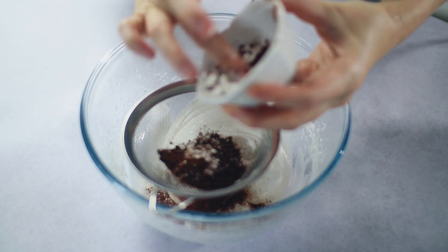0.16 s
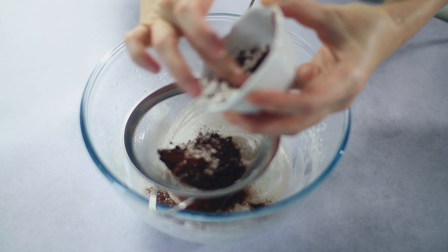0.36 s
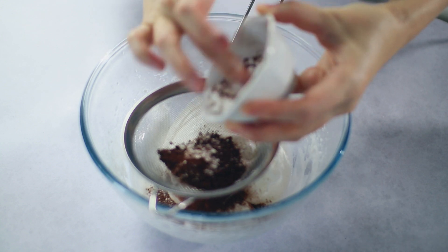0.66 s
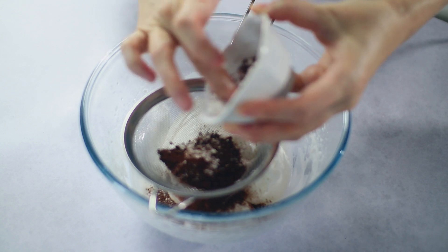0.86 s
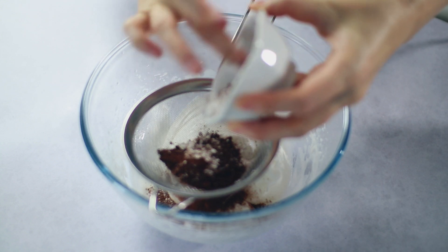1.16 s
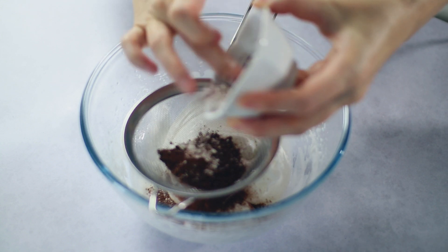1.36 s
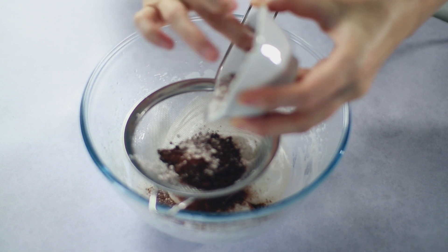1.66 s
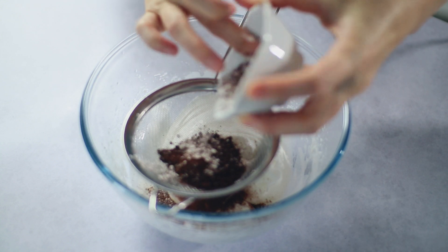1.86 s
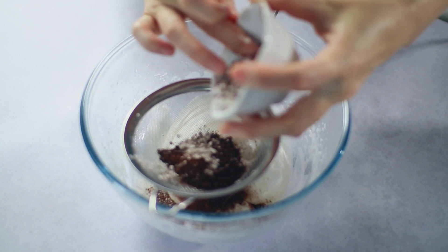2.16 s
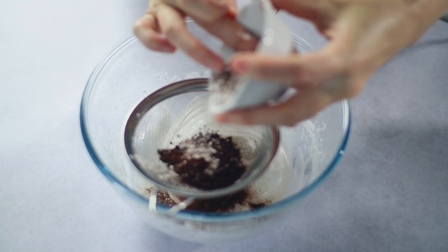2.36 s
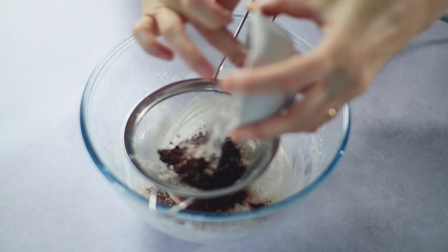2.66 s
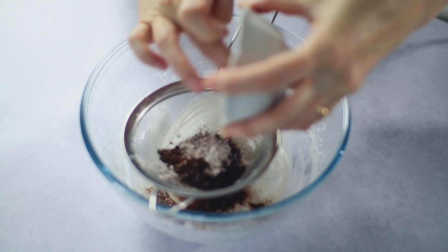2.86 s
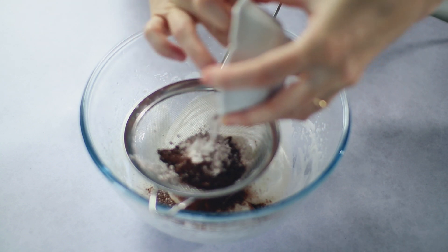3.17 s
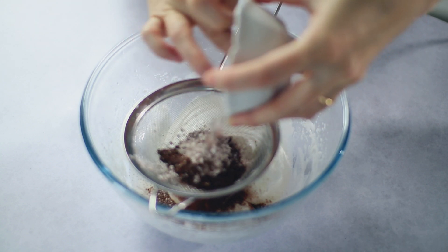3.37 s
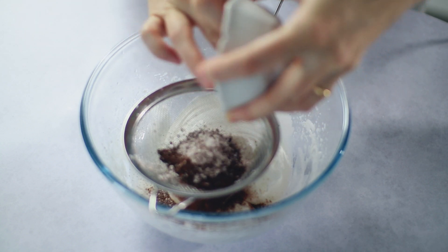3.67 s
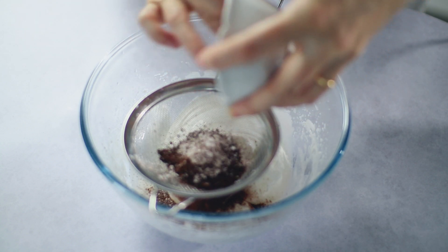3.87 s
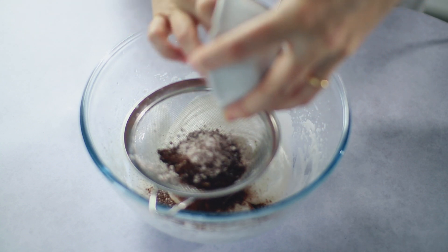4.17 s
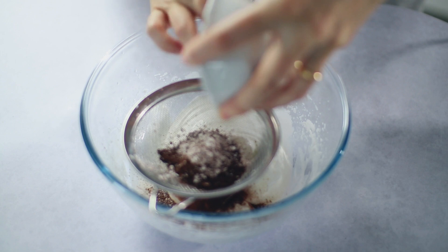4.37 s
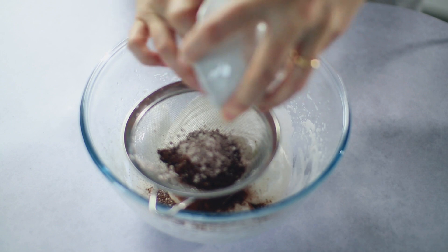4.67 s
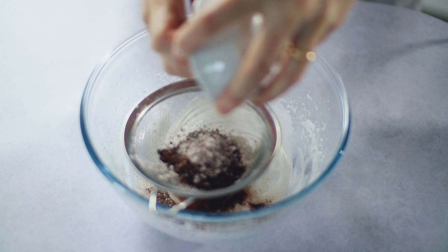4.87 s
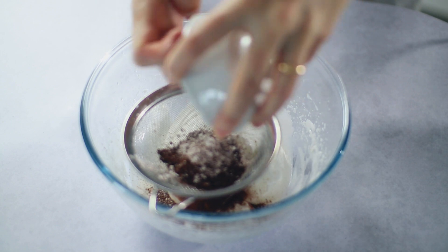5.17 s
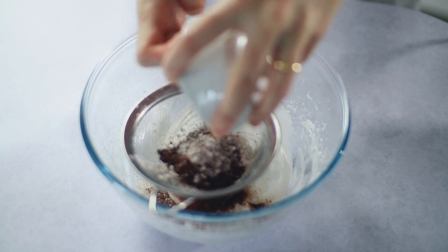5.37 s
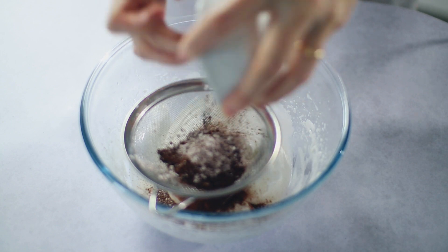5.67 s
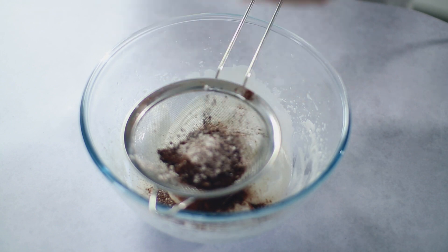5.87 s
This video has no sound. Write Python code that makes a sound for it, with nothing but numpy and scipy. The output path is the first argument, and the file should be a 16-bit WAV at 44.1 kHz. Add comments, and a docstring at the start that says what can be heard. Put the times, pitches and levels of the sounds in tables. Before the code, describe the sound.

In a quiet kitchen, a fingertip faintly rubs powder out of a small porcelain dish. The dish grazes the rim of a steel sieve resting in a glass bowl, then gives several short, bright clinks, each damped by the hand. Near the end it is knocked on the sieve four times in quick succession. The sounds are close, with a short room echo over soft hiss and a faint appliance drone.

```python
"""Emptying a dish into a sieve

In a quiet kitchen, a fingertip wipes powder from a small porcelain dish into a steel sieve that
rests in a glass bowl. The dish clinks against the sieve's rim, and the hand damps its ring.
At the end it is knocked hard on the sieve four times. The room answers every blow with a short echo.
Behind it all are a soft hiss, a faint appliance drone and, at the start, a far-off whine."""
import sys
import numpy as np
from scipy import signal
from scipy.fft import rfft, irfft
from scipy.io import wavfile

SR = 44100
rng = np.random.default_rng(int(sys.argv[2]) if len(sys.argv) > 2 else 0)


def unload_wav(signal):
    """Save mono or channel-first audio to the path in sys.argv[1] as 16-bit WAV at rate SR, clipped to [-1, 1]."""
    wavfile.write(
        sys.argv[1],
        SR,
        np.round(np.clip(np.atleast_2d(signal).T, -1, 1) * 32767).astype(np.int16),
    )


N = 265923
TIME = np.arange(N) / SR

# The dish barely grazes the rim. Each row: start in seconds, high ring in dB, click in dB.
GRAZES = [(0.8279, -29.5, -23.5), (0.912, -47.5, -41), (1.3050, -37, -46), (1.5360, -49, -43),
          (3.3231, -43, -25), (3.9972, -31.5, -31)]
# The dish's edge strikes the rim. Each row: start in seconds, then click, low ring, high ring and
# sieve knock in dB, then the pitch in Hz below which the sieve hardly sounds.
CLINKS = [ (2.0623, -1.5, -12.5, -15, -60, 1410), (2.6585, 5, -55, -30, -30, 2100),
          (3.0053, -7.5, -20.5, -25, -46.5, 1500), (3.7804, 2, -19, -20.5, -10, 1485),
          (4.955, 5, -16.5, -17.5, -14, 700), (5.096, -3.5, -40.5, -39, -40, 1600), ]
# The dish is knocked squarely on the sieve. Each row: start in seconds, sieve knock in dB,
# click in dB, the pitch in Hz below which the sieve hardly sounds.
KNOCKS = [(5.1196, 2, 8.5, 330), (5.2687, -1.5, -1, 470), (5.4237, -1, 7, 450), (5.5802, -6.5, -5.5, 480)]
# The tones of the hand-held dish. Each row: pitch in Hz, level in dB, seconds to fade by 60 dB
# (called t60 below), group (0 follows the low ring level, 1 and 2 the high ring level).
DISH_TONES = [(3743, -3, 0.033, 0), (7448, 5.5, 0.019, 1), (6900, -15.5, 0.039, 1), (7740, -42.5, .4, 1),
              (11170, -21.5, .025, 0), (12240, -22, 0.036, 2), (14800, -27, .025, 2)]
# The tones of the powder-filled sieve in its bowl. Each row: pitch in Hz, level in dB, t60 in seconds.
SIEVE_TONES = [(410, -15.5, 0.0043), (688, -11.5, 0.019), (783, -11.5, 0.017), (936, -14.5, 0.018),
               (1106, -16.5, 0.02), (1503, -21, 0.025), (1669, -3, 0.013), (1877, -9, 0.0072),
               (2210, -21.5, 0.013), (2850, -19, 0.0027), (635, -41, 0.13), (1750, -44, 0.35)]
# The tone colours of the click, the rim's chatter and the powder. Each row: frequency in Hz, gain in dB.
CLICK_COLOUR = [(300, -42), (1500, -33.5), (2100, -15.5), (2700, -5), (4000, -3.5), (5500, -2), (6700, -4),
                (8300, -2.5), (10000, -11.5), (13000, -10), (16000, -21)]
CHATTER_COLOUR = [(1000, -43.5), (5000, -33), (6600, -13), (8000, -3), (9300, -9.5), (11000, -13),
                  (16000, -27)]
POWDER_COLOUR = [(500, -30), (2500, -11), (5000, -7.5), (6500, -7.5), (8500, -2.5), (11000, -6.5),
                 (13500, -13), (16000, -7.5)]
# Firm fingertip strokes. Each row: middle in seconds, length of the main part in seconds, high ring in dB.
FIRM_STROKES = [(0.137, .12, -74), (0.916, 0.15, -76), (1.342, .12, -74), (1.593, 0.11, -75),
                (1.781, .057, -67), (2.23, .15, -60.5), (2.57, .1, -76), (2.841, .18, -64),
                (4.064, 0.16, -77), (4.295, 0.072, -74), (4.497, .1, -69), (4.713, 0.049, -74)]
# Bumps through the bowl to the worktop. Each row: start in seconds, length in seconds, gain in dB.
THUDS = [(0.102, 0.54, -74), (3.777, 0.013, -57), (4.004, 0.27, -78), (5.113, 0.011, -51)]
# The kitchen's echo. Each row: band's bottom and top in Hz, early echo in dB, tail in dB,
# tail's t60 in seconds.
ECHO_BANDS = [(153, 2000, -16.5, -25.5, 0.3), (964, 3900, -21, -24, 0.33), (3020, 5050, -10.5, -16, 0.29),
              (6100, 9600, -11.5, -13, 0.37), (10400, 48000, -10, -16, .35)]
# The tone colour of the room's hiss. Each row: frequency in Hz, gain in dB.
HISS_COLOUR = [(12, -37.5), (20, -3), (86, -9.5), (198, -4.5), (228, -12.5), (328, -3.5), (357, -6),
               (1330, -12), (1960, -11), (2260, -10), (3340, -13), (7310, -14.5), (8890, -15.5),
               (14700, -16.5), (16000, -22)]
# The appliance drone. Each row: centre in Hz, width in Hz, level in dB.
DRONE_BANDS = [(84.5, 12, -84), (614, 14, -86.5), (1320, 220, -79.5), (4307, 460, -78.5)]


def blows(walls=3, lead_s=.004, dish_to_walls_db=-3, sieve_to_walls_db=-1):
    """The dish hits the sieve. Row 0 goes straight to the listener; the other rows go to the walls."""
    out = np.zeros((1 + walls, N))
    t = np.maximum(TIME[:2 ** 14] - lead_s, 0)  # the lead gives the push time to swell
    for s, knock_db, lowest_hz, click_db, click_hz, low_db, high_db, chatter_db, room_db in blow_list():
        sieve = undb(knock_db) * sieve_knock(t, lowest_hz)
        dish = dish_ring(t, low_db, high_db)
        add(out[0], s - lead_s, sieve + dish + contact(t, click_db, click_hz, chatter_db))
        # hand and bowl shield the rings; the contact noise differs in each direction
        shielded = undb(sieve_to_walls_db) * sieve + undb(dish_to_walls_db) * dish
        for wall in out[1:]:
            add(wall, s - lead_s, undb(room_db) * (shielded + contact(t, click_db, click_hz, chatter_db)))
    return out


def blow_list():
    """The start time and settings of every graze, clink and knock."""
    kinds = (graze, GRAZES), (clink, CLINKS), (square_knock, KNOCKS)
    return [(s, *settings(*row)) for settings, table in kinds for s, *row in table]


def graze(high_db, click_db, lowest_hz=704, click_hz=9000, room_db=3.5):
    """Settings for a light touch: mostly the dish's high ring and the rim's rasp, with a trace of sieve."""
    knock_db = click_db - 20
    low_db, chatter_db = high_db - 27, high_db + 20.5
    return knock_db, lowest_hz, click_db, click_hz, low_db, high_db, chatter_db, room_db


def clink(click_db, low_db, high_db, knock_db, lowest_hz):
    """Settings for an edge blow: bright when glancing, duller and with less echo when it lands squarely."""
    squareness_db = knock_db - click_db
    click_hz = 8400 - 100 * squareness_db
    room_db = -3.5 - 0.1115 * squareness_db
    chatter_db = high_db + 16.5
    return knock_db, lowest_hz, click_db, click_hz, low_db, high_db, chatter_db, room_db


def square_knock(knock_db, click_db, lowest_hz, room_db=0.4):
    """Settings for a square blow: harder contact makes the click brighter and the dish ring more."""
    click_hz = 6800 + 171 * click_db
    low_db, high_db = -34 + 2 * click_db, -44 + 2 * click_db
    chatter_db = high_db + 19
    return knock_db, lowest_hz, click_db, click_hz, low_db, high_db, chatter_db, room_db


def dish_ring(t, low_db, high_db, rise_s=0.00088, detune=0.0015):
    """The spot that is hit sets how strongly each tone rings; the grip shifts the pitches a little."""
    strength = undb([low_db, high_db, high_db])
    ring = 0
    for hz, db, t60, group in DISH_TONES:
        pitch = hz * (1 + detune * rng.standard_normal())
        ring += strength[round(group)] * undb(db) * np.sin(2 * np.pi * pitch * t) * fade(t, t60)
    return ring * (1 - np.exp(-t / rise_s))


def sieve_knock(t, lowest_hz, top_hz=2900, slope=10, rise_s=.00015):
    """One short push starts the sieve's dull tones; a glancing blow leaves the low ones at rest."""
    ring = sum(undb(db) * np.cos(2 * np.pi * hz * t) * fade(t, t60) for hz, db, t60 in SIEVE_TONES)
    ring *= 1 - np.exp(-t / rise_s)
    hz = np.arange(len(t) // 2 + 1) * SR / len(t) + 1
    # the force swells and ebbs evenly around the moment of contact
    push = 1 / np.sqrt((1 + (lowest_hz / hz) ** slope) * (1 + (hz / top_hz) ** slope))
    fade_out = 1 - (t / t[-1]) ** 2
    return irfft(rfft(ring) * push, len(t)) * fade_out


def contact(t, click_db, click_hz, chatter_db):
    """The hard first click, and the thin steel rim chattering on the glaze just after it."""
    click = colour(burst(t, t60=0.014, rise_s=.0001), CLICK_COLOUR)
    chatter = colour(burst(t, t60=0.02, rise_s=0.00067), CHATTER_COLOUR)
    return undb(click_db) * cut(click, click_hz, "lowpass") + undb(chatter_db) * chatter


def handle_snap(start_s=2.6584, level_db=-4.5, pitch_hz=6200, width_hz=2000):
    """As the dish is turned it catches the sieve's wire handle: one short, bright snap."""
    out = np.zeros(N)
    snap = burst(TIME[:SR], t60=0.0041, rise_s=.0001)
    for _ in range(2):
        snap = resonate(snap, pitch_hz, width_hz)
    add(out, start_s, undb(level_db) * snap / np.sqrt(np.sum(snap ** 2)))
    return out


def fingertip(grain_db=3, high_width_hz=130, top_width_hz=260):
    """Skin drags powder over the glaze: tiny uneven slips hiss and set two of the dish's tones singing."""
    out = np.zeros(N)
    high_hz, top_hz = DISH_TONES[1][0], DISH_TONES[5][0]
    for middle_s, length_s, high_db, top_db in stroke_list():
        hiss_db = -91.5 + 157 * length_s  # a longer stroke sweeps more powder
        n = int(length_s * SR * 1.4)  # extra time to fade in and out
        slips = rng.standard_normal(n) * undb(grain_db * rng.exponential(size=n))
        sing = undb(high_db) * unit(resonate(slips, high_hz, high_width_hz))
        sing += undb(top_db) * unit(resonate(slips, top_hz, top_width_hz))
        hiss = undb(hiss_db) * unit(colour(slips, POWDER_COLOUR))
        add(out, middle_s - n / SR / 2, np.hanning(n) * (sing + hiss))
    return out


def stroke_list(start_s=.37, end_s=4.5, wipes_per_s=3.8, scatter_s=0.024,
                wipe_s=0.054, wipe_high_db=-78, wipe_top_db=-92):
    """The firm strokes, plus light wiping at a slightly uneven pace."""
    # the glaze sings brighter as it is wiped bare: the top ring gains 2.9 dB a second
    firm = [(s, length_s, high_db, -85.5 + 2.9 * s) for s, length_s, high_db in FIRM_STROKES]
    beats = np.arange(start_s, end_s, 1 / wipes_per_s)
    light = [(s + scatter_s * rng.standard_normal(), wipe_s, wipe_high_db, wipe_top_db) for s in beats]
    return firm + light


def squeak(start_s=5.374, length_s=0.048, pitch_hz=1540, width_hz=130):
    """The dish slips in the grip between two knocks and gives a brief, rough squeak."""
    out, n = np.zeros(N), int(length_s * SR)
    tone = sum(undb(db) * unit(resonate(rng.standard_normal(n), harmonic * pitch_hz, width_hz))
               for harmonic, db in [(2, -60), (3, -56.5), (4, -66)])
    add(out, start_s, np.hanning(n) * tone)
    return out


def thuds(top_hz=260):
    """The bowl presses on the worktop and makes dull bumps."""
    out = np.zeros(N)
    for start_s, length_s, db in THUDS:
        n = int(length_s * SR)
        rumble = unit(cut(rng.standard_normal(n), top_hz, "lowpass", order=1))
        add(out, start_s, undb(db) * np.hanning(n) * rumble)
    return cut(out, hz=700, kind="lowpass")


def kitchen_echo(x, early_t60=0.11, early_rise_s=0.0028, tail_rise_s=0.019):
    """Close echoes from worktop and cupboards, then the soft tail of the room."""
    t, echo = TIME[:SR], 0
    for bottom_hz, top_hz, early_db, tail_db, t60 in ECHO_BANDS:
        early = undb(early_db) * burst(t, early_t60, early_rise_s)
        tail = undb(tail_db) * burst(t, t60, tail_rise_s)
        band = cut(early + tail, bottom_hz, "highpass", order=4)
        echo += cut(band, top_hz, "lowpass", order=4)
    return signal.fftconvolve(x, echo)[:N]


def whine(settled_hz=2150, sag_hz=210, sag_s=0.32, waver_hz=22,
          level_db=-76, fade_db_per_s=9, rise_s=.12, release_s=0.28, end_s=1.1):
    """A thin, wavering, far-off tone that swells, sinks in pitch and dies away."""
    waver = waver_hz * unit(cut(rng.standard_normal(N), 40, "lowpass"))
    pitch = settled_hz + sag_hz * np.exp(-TIME / sag_s) + waver
    swell = np.clip(np.minimum(TIME / rise_s, (end_s - TIME) / release_s), 0, 1)
    return swell * undb(level_db - fade_db_per_s * TIME) * np.sin(2 * np.pi * np.cumsum(pitch) / SR)


def room_tone(hiss_db=-68.5):
    """An even hiss with the faint drone of an appliance."""
    hiss = undb(hiss_db) * unit(colour(rng.standard_normal(N), HISS_COLOUR))
    drone = sum(undb(db) * unit(resonate(rng.standard_normal(N), hz, width_hz))
                for hz, width_hz, db in DRONE_BANDS)
    return hiss + drone


def undb(db):
    """Turn decibels into a gain."""
    return 10 ** (np.asarray(db) / 20)


def unit(x):
    """Scale a sound to an average (rms) level of 1."""
    return x / np.sqrt(np.mean(x ** 2))


def add(track, s, sound):
    """Mix a sound into the track at s seconds."""
    i = max(int(s * SR), 0)
    track[i:i + len(sound)] += sound[:len(track) - i]


def colour(x, points, size=4096):
    """Filter a sound so that its gain follows a curve of (Hz, dB) points."""
    hz, db = np.transpose(points)
    bins = np.maximum(np.arange(size // 2 + 1) * SR / size, 1)
    gain = undb(np.interp(np.log(bins), np.log(hz), db))
    cepstrum = irfft(np.log(gain))
    # fold the filter so that nothing rings before the sound arrives
    cepstrum[1:size // 2] *= 2
    cepstrum[size // 2 + 1:] = 0
    response = irfft(np.exp(rfft(cepstrum)))
    return signal.fftconvolve(x, response)[:len(x)]


def cut(x, hz, kind, order=2):
    """Keep what lies below hz ("lowpass") or above it ("highpass")."""
    return signal.sosfilt(signal.butter(order, min(hz, 0.45 * SR), kind, fs=SR, output="sos"), x)


def resonate(x, hz, width_hz):
    """Keep a band around one pitch, with a gain of 1 at its centre."""
    return signal.lfilter(*signal.iirpeak(hz, hz / width_hz, fs=SR), x)


def fade(t, t60):
    """Die away by 60 dB in t60 seconds."""
    return np.exp(-np.log(1000) * t / t60)


def burst(t, t60, rise_s):
    """A puff of dying noise with a total energy of 1."""
    noise = rng.standard_normal(len(t)) * fade(t, t60) * (1 - np.exp(-t / rise_s))
    return noise / np.sqrt(np.sum(noise ** 2))


def scene(snap_to_walls_db=-8):
    """Blows and rubbing close by, an echo from each wall, and the quiet background."""
    direct, *to_walls = blows()
    rubbing, snap = fingertip() + squeak(), handle_snap()
    echo = sum(kitchen_echo(sound + rubbing + undb(snap_to_walls_db) * snap) for sound in to_walls)
    echo /= np.sqrt(len(to_walls))
    return (direct + rubbing + snap + thuds() + echo + whine() + room_tone())[None]


def record(dry, top_hz=16000):
    """Cut off the very highest treble steeply."""
    return signal.sosfilt(signal.ellip(10, .2, 70, top_hz, fs=SR, output="sos"), dry)


dry = scene()
out = record(dry)
unload_wav(out)
```